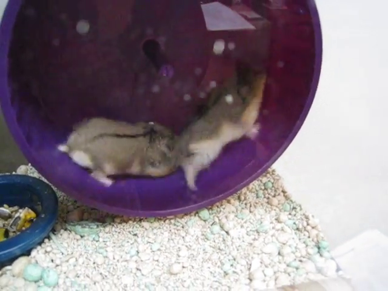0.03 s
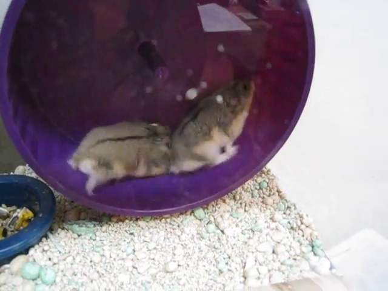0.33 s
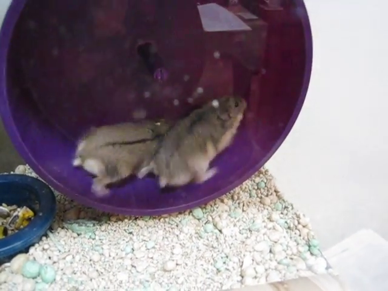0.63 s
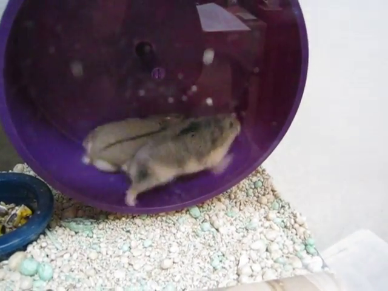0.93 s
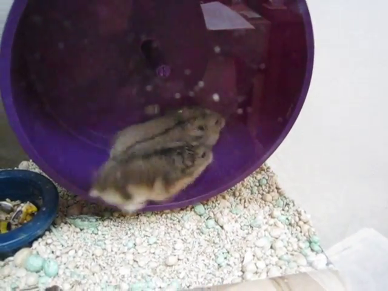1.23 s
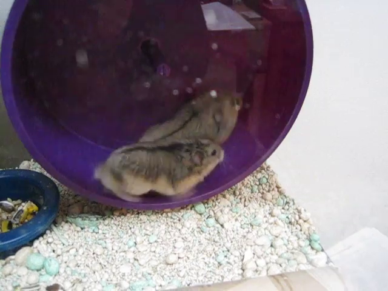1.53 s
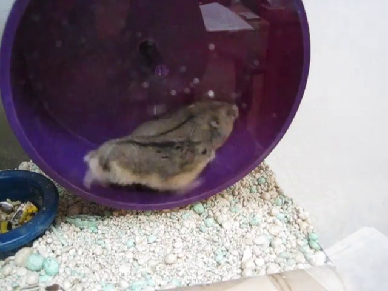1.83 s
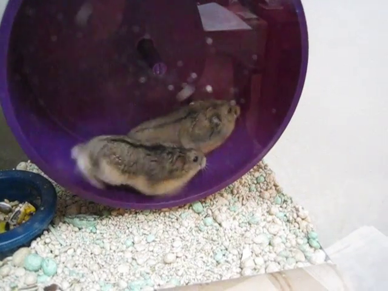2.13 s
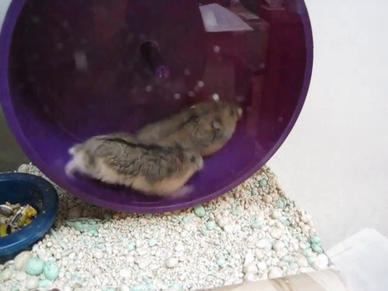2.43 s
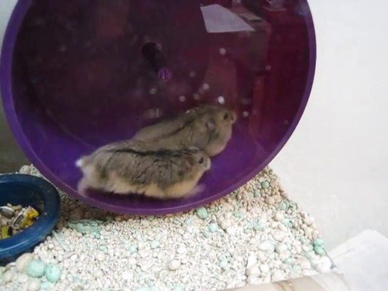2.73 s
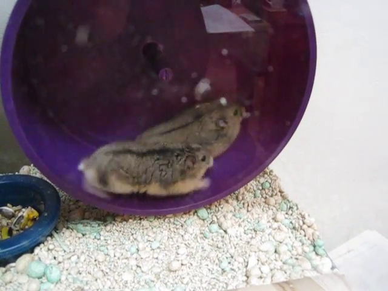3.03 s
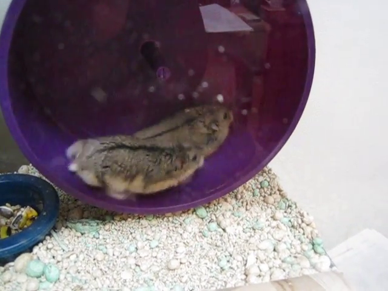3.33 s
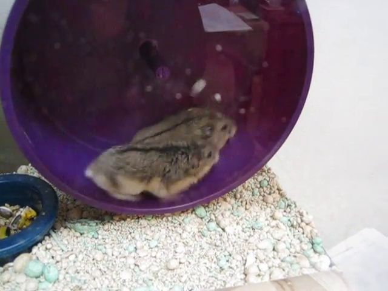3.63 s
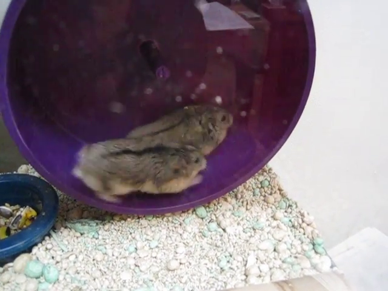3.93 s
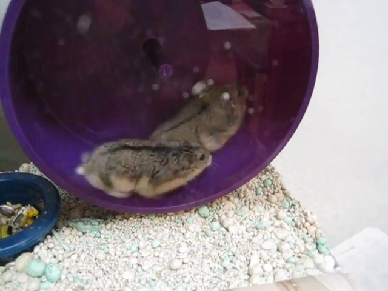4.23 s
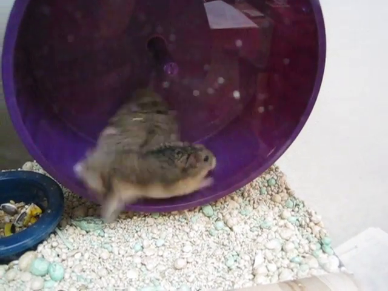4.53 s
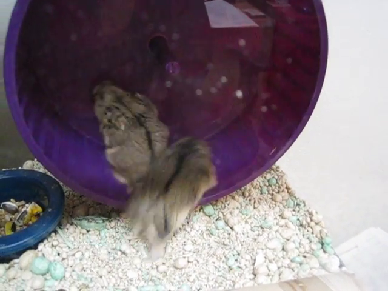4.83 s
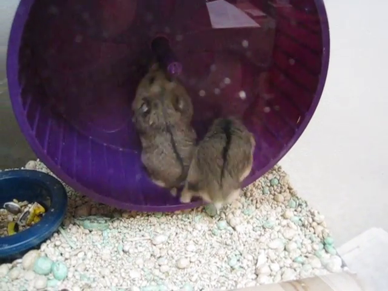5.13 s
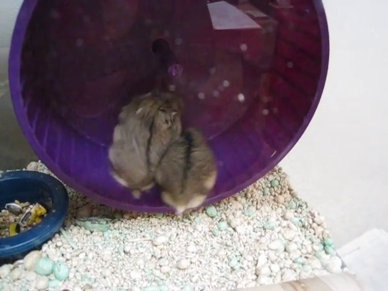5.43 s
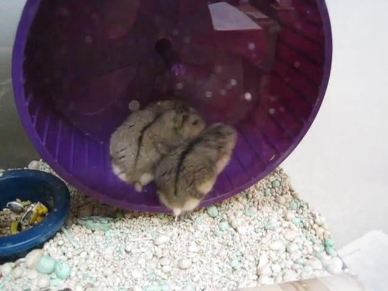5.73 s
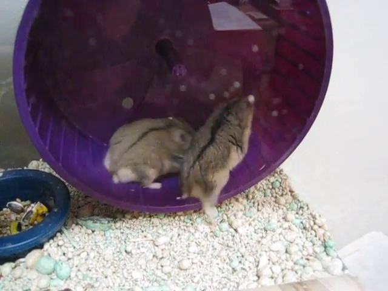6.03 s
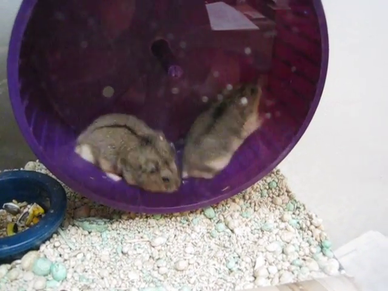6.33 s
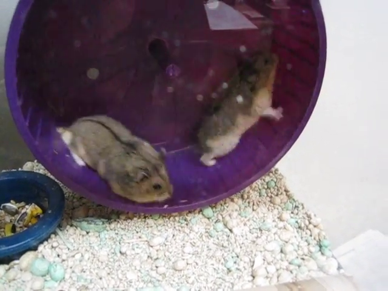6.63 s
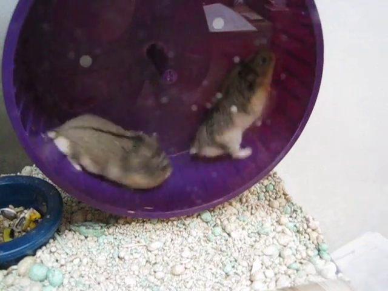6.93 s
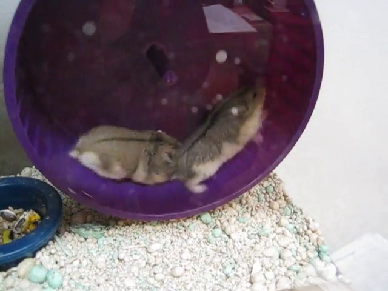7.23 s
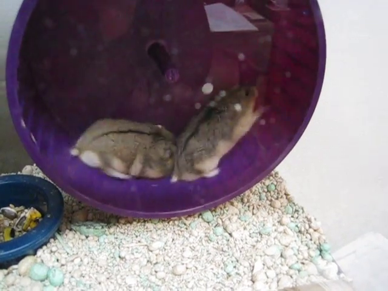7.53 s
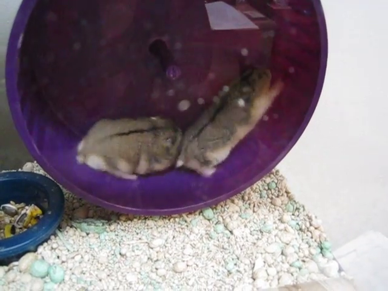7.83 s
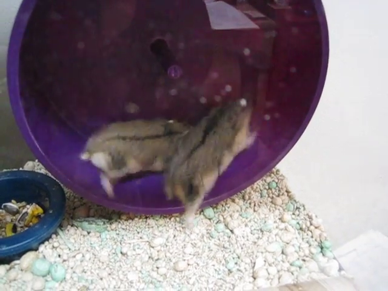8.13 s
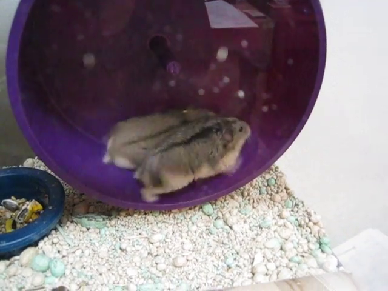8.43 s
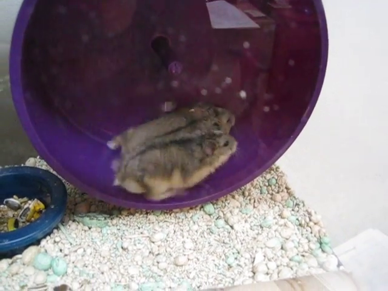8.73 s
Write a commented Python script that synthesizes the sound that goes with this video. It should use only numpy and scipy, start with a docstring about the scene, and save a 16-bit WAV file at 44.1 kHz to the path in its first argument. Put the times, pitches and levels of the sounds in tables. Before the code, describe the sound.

Two hamsters run in a plastic exercise wheel, heard close by in a quiet room with a faint steady hum and hiss. From the start, light, uneven claw steps patter and scrape on the ribbed track over the soft rustle and low rumble of the turning drum, with a few faint bumps. At about 1.6 seconds the axle gives one very short, high chirp. The wheel then knocks against its mount in irregular, hollow, briefly ringing blows until about 3.8 seconds. These are the loudest sounds, strongest near 1.8, 2.4 and 2.9 seconds. The running fades and almost stops between 5 and 6 seconds, with one small clack around 6. From about 6.3 seconds the pattering returns with sharper ticks and scratches, busiest near 7 and 8 seconds, then eases, with a couple of faint bumps just before 9 seconds.

```python
"""A plastic exercise wheel knocks hollowly on its mount as two dwarf hamsters crowd each other and rock it.
Each blow rings the modes of the drum; the axle sticks and chirps once.
Claws patter and scrape on the ribbed track, over the soft rustle and rumble of the turning drum.
Heard close by in a quiet room, with a faint hum and hiss."""
import sys
import numpy as np
from scipy import signal
from scipy.fft import rfft, irfft
from scipy.io import wavfile

SR = 44100
rng = np.random.default_rng(int(sys.argv[2]) if len(sys.argv) > 2 else 0)


def master(y):
    """Save y as 16-bit WAV."""
    cut = np.clip(np.atleast_2d(y).T, -1, 1)
    pcm = np.round(cut * 32767)  # scale
    wavfile.write(sys.argv[1], SR, pcm.astype(np.int16))


N = 396900
TIME_S = np.arange(N) / SR

# Room air and hiss: freq_hz, density_db
ROOM_SPECTRUM = [(12, -37), (20, 0), (63, -4.5), (81, -8.5), (103, -4), (239, -7.5), (353, -9), (394, -11),
                 (909, -15), (1310, -20.5), (1540, -13), (1680, -18), (5880, -28), (13200, -33.5),
                 (15600, -32.5)]
# How hard the animals run; they nearly stop when one tumbles out: time_s, effort_db
RUN_EFFORT = [(0, -48.5), (.6, -54), (.9, -54.5), (1.65, -54), (1.83, -52), (2.1, -51), (2.45, -51),
              (3.2, -52.5), (3.9, -56), (4.3, -55), (5, -62), (5.8, -66), (6.35, -59), (7.17, -48.5),
              (7.45, -56.5), (8.05, -52.5), (8.6, -57.5), (9, -54.5)]
# Main drum modes: freq_hz, gain_db, t60_s
DRUM_MODES = [(144, -8, 0.6), (191, 0, 0.26), (214, 1, 0.25), (256, -5, 0.25), (365, -7, 0.55),
              (388, -7, 0.25), (536, -6, 0.18), (571, -3, 0.2), (630, -6, 0.18), (684, 2, 0.2),
              (764, -7, 0.16), (853, -5, 0.17), (912, -10, 0.5), (983, 0, 0.18), (1031, -3, 0.16),
              (1133, -4, 0.16), (1279, -7, 0.15), (1386, -7, 0.14), (1502, -6, 0.14), (1599, -4, 0.13),
              (1744, -4, 0.13), (1957, -1, 0.12), (2021, -6, 0.12), (2160, -3, 0.11), (2365, -4, 0.1),
              (2720, -10, 0.09), (3190, -10, 0.08), (3424, -7, 0.08), (3526, -6, 0.08), (4250, -15, 0.13)]
# Dense weak modes of drum and cage: freq_hz, gain_db, t60_s
SHELL_SPECTRUM = [(120, -24, 0.36), (207, -12, 1), (440, -4, 0.13), (866, -6, 0.25), (1920, -9.5, 0.2),
                  (2800, -14, 0.11), (3900, -25, 0.18), (6170, -21, 0.076), (9250, -24.5, 0.044),
                  (14000, -42, .04)]
# Track resonances under a claw: freq_hz, width_hz, gain_db
TRACK_MODES = [(1547, 280, 6.5), (2116, 166, 7.5), (2410, 245, 2), (3130, 130, -3.5), (4187, 186, 2.5),
               (4840, 73, -31), (5587, 95, 0.5), (7190, 100, -5), (9160, 200, -18)]
# Prominent footfalls, pads dull, claws bright: start_s, contact_s, level_db, tilt_db_per_octave
FOOTFALLS = [(0.149, 0.016, -49.5, -4), (0.265, .02, -54.5, -3), (0.352, .009, -51, 0.5),
             (0.472, 0.0074, -52, -1.5), (0.627, 0.045, -56, -2.5), (0.738, 0.025, -53, -0.5),
             (0.878, .007, -54.5, 1), (0.933, .004, -50.5, -1), (0.984, 0.0082, -54, 1),
             (1.095, .008, -51.5, -3.5), (1.131, 0.0089, -50.5, -9), (1.359, .011, -65.5, -14.5),
             (1.507, 0.021, -60, -8.5), (2.044, 0.014, -57.5, -5.5), (2.146, 0.0076, -53, 1),
             (2.308, 0.0037, -55.5, -10.5), (2.402, .011, -58, -1), (2.612, .008, -56, -1),
             (2.729, 0.004, -48, -2.5), (3.459, 0.013, -53.5, -7.5), (3.773, 0.011, -49.5, -5),
             (3.986, 0.0087, -63.5, -15), (4.133, .012, -62.5, -10.5), (4.602, 0.013, -56, -2.5),
             (5.571, 0.037, -63.5, -5.5), (5.968, .012, -63.5, -12), (5.983, .012, -62, -14),
             (6.028, .011, -58, -1), (6.333, 0.0071, -52.5, 1.5), (6.527, 0.008, -46.5, 0.5),
             (6.613, 0.0036, -42.5, -4.5), (6.662, 0.011, -49, -4.5), (6.723, 0.03, -56.5, -3),
             (6.805, .012, -52.5, -4.5), (7.043, 0.0034, -42, -6), (7.132, .007, -48, 1),
             (7.153, 0.0044, -51.5, -10), (7.186, 0.013, -49, -4.5), (7.232, 0.021, -56.5, -2),
             (7.31, .012, -60.5, -11), (7.372, .006, -50, -1), (7.628, .012, -54.5, -3.5),
             (7.65, 0.009, -50, 1), (7.773, .009, -56.5, 3), (7.905, 0.014, -50.5, -4),
             (8.024, 0.011, -49, -4), (8.062, .012, -51.5, -1.5), (8.091, .006, -47.5, 1),
             (8.113, 0.0096, -47, -7.5), (8.143, 0.049, -57.5, -6), (8.399, 0.041, -58.5, -5),
             (8.942, .01, -64, -13)]
# Footfall bands: low_hz, high_hz
STEP_BANDS_HZ = [(1550, 3300), (3300, 7000), (7000, 15000)]
# Drum response to a fully hard blow: freq_hz, gain_db, clack_share
BLOW_RESPONSE = [(210, -0.5, 0), (420, -3, 0.42), (805, 0, 0.88), (1610, 1.5, 1), (3160, 0, 0.75),
                 (7200, -4, 0.4)]
# Knock bands: low_hz, high_hz
KNOCK_BANDS_HZ = [(145, 300), (300, 600), (600, 1100), (1100, 2400), (2400, 4300), (4300, 12000)]
# Drum hitting its mount: start_s, thump_db, clack_db, hardness_hz, low_mode_hz, high_mode_hz, damping_s
MOUNT_BLOWS = [(0.086, -53, -67, 800, 144, 1540, 0.3), (1.131, -59, -56, 2400, 985, 2100, 0.034),
               (1.241, -53, -69, 700, 214, 1500, 0.14), (1.602, -48.5, -55, 1500, 390, 1500, .25),
               (1.675, -38.5, -36, 2110, 365, 2170, 0.65), (1.758, -33.5, -34, 1700, 365, 1776, .13),
               (1.839, -32, -31.5, 3180, 690, 1570, .1), (1.932, -45, -46, 1405, 390, 1580, 0.2),
               (2.128, -50, -54, 1300, 214, 1550, 0.25), (2.213, -45.5, -55, 700, 965, 2340, 0.11),
               (2.381, -41, -43, 1090, 365, 1930, 0.034), (2.428, -42, -46, 1800, 390, 1470, 0.053),
               (2.448, -31, -28.5, 5100, 980, 2055, .7), (2.831, -47, -36.5, 900, 580, 1650, 0.02),
               (2.839, -30, -33, 3200, 685, 2376, .4), (2.915, -29.5, -35, 2050, 680, 1736, .55),
               (3.103, -42.5, -50.5, 2010, 675, 1500, .25), (3.174, -36, -41, 945, 685, 1465, 0.12),
               (3.279, -40, -56, 2440, 390, 1533, .25), (3.354, -46, -56, 700, 390, 1525, .25),
               (3.519, -36, -33.5, 1420, 855, 1730, 0.073), (3.612, -37, -42.5, 1280, 365, 1370, 0.49),
               (3.693, -39, -37.5, 1590, 365, 1120, .12), (3.797, -38, -44, 900, 365, 2190, 0.047),
               (3.843, -59, -56, 1500, 390, 2120, .25), (5.983, -71, -46.5, 2000, 1386, 1480, 0.031),
               (7.368, -61, -60, 1490, 365, 1480, .1), (8.661, -59, -69, 700, 390, 1530, .2),
               (8.74, -58, -63, 700, 214, 1530, .2)]


def amp(db):
    """Decibels to gain."""
    return 10 ** (np.asarray(db) / 20)


def unit(x):
    """Scale to unit rms."""
    return x / np.sqrt(np.mean(x ** 2) + 1e-20)


def lookup(table, hz, column=1):
    """Interpolate a column over log frequency."""
    columns = np.transpose(table)
    return np.interp(np.log(hz + 1), np.log(columns[0] + 1), columns[column])


def place(starts_s, sounds):
    """Mix sounds in at their start times."""
    out = np.zeros(N)
    for start_s, sound in zip(starts_s, sounds):
        part = out[max(round(start_s * SR), 0):][:len(sound)]
        part += sound[:len(part)]
    return out


def band(x, edges_hz, order=3):
    """Causal band-pass."""
    return signal.sosfilt(signal.butter(order, edges_hz, "bandpass", fs=SR, output="sos"), x)


def coloured(x, spectrum):
    """Apply a spectrum; unit rms out."""
    gain = amp(lookup(spectrum, np.fft.rfftfreq(N, 1 / SR)))
    return unit(irfft(rfft(x) * gain, N))


def set_band_levels(sounds, bands_hz, levels_db, window_s, onset_s=0):
    """Set each row's rms per band, taken over a window from its onset."""
    t = np.arange(sounds.shape[1]) / SR - onset_s
    window = (t >= 0) & (t < np.reshape(window_s, (-1, 1)))
    out = 0
    for edges_hz, db in zip(bands_hz, levels_db):
        part = band(sounds, edges_hz)
        power = (part ** 2 * window).sum(1) / window.sum(1)
        out = out + part * (amp(db) / np.sqrt(power + 1e-20))[:, None]
    return out


def grit(shape, rate_hz, spread_db):
    """Tiny random clicks, a few much larger than the rest."""
    sizes = amp(spread_db * np.minimum(rng.exponential(1, shape), 4))
    return unit(rng.standard_normal(shape) * sizes * (rng.random(shape) < rate_hz / SR))


def room(air_db=-53.5, hum_db=-66, hum_band_hz=(105, 119)):
    """Steady air and hiss with a faint blurred hum."""
    hum = unit(band(rng.standard_normal(N), hum_band_hz, order=1))
    air = coloured(rng.standard_normal(N), ROOM_SPECTRUM)
    return amp(air_db) * air + amp(hum_db) * hum


def pulsed_hiss(first_s=.07, period_s=1, length_s=.22, gain_db=-74, band_hz=(13000, 14200)):
    """A faint, thin high hiss comes and goes."""
    gate = (TIME_S - first_s) % period_s < length_s
    return amp(gain_db) * gate * unit(band(rng.standard_normal(N), band_hz))


def effort_db(time_s):
    """Running effort at the given times."""
    return np.interp(time_s, *np.transpose(RUN_EFFORT))


def drum_ring(t, boost_db=0, detune=1):
    """Decaying drum modes at random phases."""
    hz, db, t60_s = np.transpose(DRUM_MODES)[:, :, None]
    cycles = hz * detune * t + rng.random(hz.shape)
    return (amp(db + boost_db) * 1000 ** (-t / t60_s) * np.sin(2 * np.pi * cycles)).sum(0)


def track_ring(spread_db, tick_db=-17):
    """Track response to one claw click: bare tick plus short plastic ring."""
    t = np.arange(SR // 20) / SR
    hz, width_hz, db = np.transpose(TRACK_MODES)[:, :, None]
    gain = amp(db + spread_db * rng.standard_normal(hz.shape)) * 2 * np.pi * width_hz / SR
    ring = (gain * np.exp(-np.pi * width_hz * t) * np.cos(2 * np.pi * hz * t)).sum(0)
    ring[:2] += amp(tick_db) / 2  # slightly blunt claw tip
    return ring


def rocking(kick_db=-45, ref_thump_db=-35, db_per_thump_db=.5, decay_s=.15):
    """Rocking envelope: each knock adds energy, which dies away."""
    start_s, thump_db = np.transpose(MOUNT_BLOWS)[:2]
    kicks = amp(kick_db + db_per_thump_db * (thump_db - ref_thump_db))
    energy_in = place(start_s, kicks[:, None] ** 2)
    return np.sqrt(signal.lfilter([1], [1, -np.exp(-2 / (decay_s * SR))], energy_in))


def rolling(rustle_db=-5, rumble_db=-12, murmur_db=-2.5, flutter_hz=(6, 28)):
    """Countless light touches rustle on the track and stir the low drum modes; rocking adds rumble."""
    running = amp(effort_db(TIME_S))
    flutter = amp(2 * unit(band(rng.standard_normal(N), flutter_hz, order=2)))
    touches = grit(N, rate_hz=9000, spread_db=1.8) * flutter
    track = signal.oaconvolve(touches, track_ring(spread_db=0))[:N]
    rustle = unit(band(track, (1250, 15000), order=2))
    treads = rng.standard_normal(N) * flutter
    murmur = unit(signal.oaconvolve(treads, drum_ring(np.arange(SR // 2) / SR))[:N])
    body = coloured(treads, SHELL_SPECTRUM) + amp(murmur_db) * murmur
    rumble = unit(band(body, (120, 520), order=2))
    return rustle * running * amp(rustle_db) + rumble * np.hypot(running * amp(rumble_db), rocking())


def axle_chirp(start_s=1.568, pitch_hz=4230, sag_hz_per_s=5500, level_db=-33.5,
               swell_s=.014, stop_s=.0046, echo_s=.011, echo_db=-13):
    """The axle sticks: a pure squeak swells, sags, breaks off and echoes from a wall."""
    t = np.arange(0, swell_s + stop_s, 1 / SR)
    envelope = amp(level_db) * np.interp(t, [0, swell_s, t[-1]], [0, 1, 0])
    cycles = np.cumsum(pitch_hz - sag_hz_per_s * t) / SR
    squeak = np.sqrt(2) * envelope * np.sin(2 * np.pi * cycles)
    return place([start_s, start_s + echo_s], [squeak, amp(echo_db) * squeak])


def trot_rows(rate_hz=9, jitter_steps=.3, contact_s=.0077, offset_db=-7.5, spread_db=3):
    """Light, uneven footfalls that follow the effort; columns as in FOOTFALLS."""
    count = int(rate_hz * N / SR)
    lateness, strength, brightness = rng.standard_normal((count, 3)).T
    start_s = (np.arange(count) + .5 + jitter_steps * lateness) / rate_hz
    level_db = effort_db(start_s) + offset_db + spread_db * strength
    tilt_db_per_octave = -2 + 4 * brightness
    return np.transpose([start_s, np.full(count, contact_s), level_db, tilt_db_per_octave])


def paw_steps(rows, lead_s=.03, landing_db=-10, landing_s=.011, release_s=.006,
              slide_db=-18, slide_s=.035, pivot_hz=5020, arch_db=2):
    """Each paw brushes down, drags its claws over the ribs and slides off; the clicks ring the track."""
    start_s, contact_s, level_db, tilt_db_per_octave = np.transpose(rows)
    t = np.arange(SR // 8) / SR - lead_s
    lifted_s = np.maximum(t - .5 * contact_s[:, None], 0)
    grip = np.exp(-lifted_s / release_s) + amp(slide_db) * np.exp(-lifted_s / slide_s)
    pressure = np.where(t < 0, amp(landing_db) * np.exp(-abs(t) / landing_s), grip)
    claws = pressure * grit(pressure.shape, rate_hz=11000, spread_db=1.9)
    spot_rings = np.array([track_ring(spread_db=4) for _ in start_s])
    scrapes = signal.fftconvolve(claws, spot_rings, axes=1)
    octaves = np.log2(np.sqrt(np.prod(STEP_BANDS_HZ, axis=1)) / pivot_hz)[:, None]
    levels_db = level_db + tilt_db_per_octave * octaves + arch_db * (.5 - octaves ** 2)
    return place(start_s - lead_s, set_band_levels(scrapes, STEP_BANDS_HZ, levels_db, contact_s, lead_s))


def shell_ring(shape, tail_db=-28, tail_stretch=6.4):
    """Dense weak modes: treble dies fast, bass lingers, the cage adds a faint longer tail."""
    hz, t, spectra = signal.stft(rng.standard_normal(shape), SR, nperseg=256)
    fall_db = -60 * t / lookup(SHELL_SPECTRUM, hz, column=2)[:, None]
    decay = amp(fall_db) + amp(tail_db + fall_db / tail_stretch)
    spectra *= amp(lookup(SHELL_SPECTRUM, hz))[:, None] * decay
    return signal.istft(spectra, SR, nperseg=256)[1][:, :shape[1]]


def mode_boost_db(low_hz, high_hz, low_db=7.5, high_db=6, spread_db=2):
    """A blow favours the two modes that move where it lands."""
    hz = np.transpose(DRUM_MODES)[0][:, None]
    boost_db = spread_db * rng.standard_normal(hz.shape)
    boost_db[np.argmin(abs(hz - low_hz))] += low_db
    boost_db[np.argmin(abs(hz - high_hz))] += high_db
    return boost_db


def blow_levels_db(thump_db, clack_db, hardness_hz, low_mode_hz, mode_band_db=3.5):
    """Weight drives the bass, clack the rest; soft contact cuts the treble by 12 dB per octave."""
    low_hz, high_hz = np.transpose(KNOCK_BANDS_HZ)[:, :, None]
    centre_hz = np.sqrt(low_hz * high_hz)
    clack_share = lookup(BLOW_RESPONSE, centre_hz, column=2)
    drive_db = (1 - clack_share) * thump_db + clack_share * clack_db
    lift_db = mode_band_db * ((low_hz <= low_mode_hz) & (low_mode_hz < high_hz))
    softness_db = 10 * np.log10(1 + (centre_hz / hardness_hz) ** 4)
    return drive_db + lookup(BLOW_RESPONSE, centre_hz) + lift_db - softness_db


def drum_knocks(rise_s=.0011, crack_db=16, crack_s=.0064, tok_db=15, tok_s=.0051,
                shell_db=-6, sway_db=-14, sway_s=.17):
    """The drum hits its mount: a crack, a pitched tok at the spot, a hollow ring; the cage sways."""
    start_s, thump_db, clack_db, hardness_hz, low_hz, high_hz, damping_s = np.transpose(MOUNT_BLOWS)
    t = np.arange(round(.45 * SR)) / SR
    shape = (len(start_s), len(t))
    shell = amp(shell_db) * unit(shell_ring(shape))
    detunes = 1 + .007 * rng.standard_normal((len(start_s), len(DRUM_MODES), 1))  # the animals' weight
    modes = unit(np.array([drum_ring(t, mode_boost_db(low, high), detune)
                           for low, high, detune in zip(low_hz, high_hz, detunes)]))
    crack = amp(crack_db) * band(rng.standard_normal(shape), (2400, 6000)) * np.exp(-t / crack_s)
    tok = amp(tok_db) * np.sin(2 * np.pi * high_hz[:, None] * t) * np.exp(-t / tok_s)
    envelope = (1 - np.exp(-(t / rise_s) ** 2)) * np.exp(-t / damping_s[:, None])
    blows = (crack + tok + modes + shell) * envelope
    levels_db = blow_levels_db(thump_db, clack_db, hardness_hz, low_hz)
    knocks = set_band_levels(blows, KNOCK_BANDS_HZ, levels_db, window_s=.035)
    sway = unit(band(rng.standard_normal(shape), (44, 72), order=1)) * np.exp(-t / sway_s)
    return place(start_s, knocks + amp(thump_db + sway_db)[:, None] * sway)


def scene():
    """Wheel and room, mono."""
    wheel = drum_knocks() + paw_steps(FOOTFALLS) + paw_steps(trot_rows()) + rolling() + axle_chirp()
    return (wheel + room() + pulsed_hiss())[None]


def record(dry):
    """Microphone treble roll-off, then a steep band limit."""
    rolloff_hz, limit_hz = 14500, 15750
    soft = signal.sosfilt(signal.butter(3, rolloff_hz, fs=SR, output="sos"), dry)
    return signal.oaconvolve(soft, signal.firwin(511, limit_hz, window=("kaiser", 9), fs=SR)[None], "same")


dry = scene()
out = record(dry)
master(out)
```